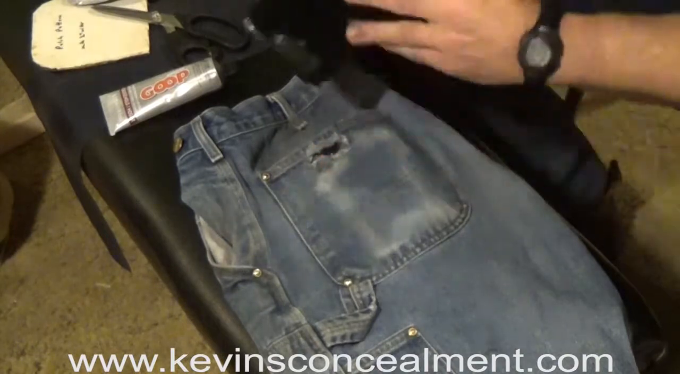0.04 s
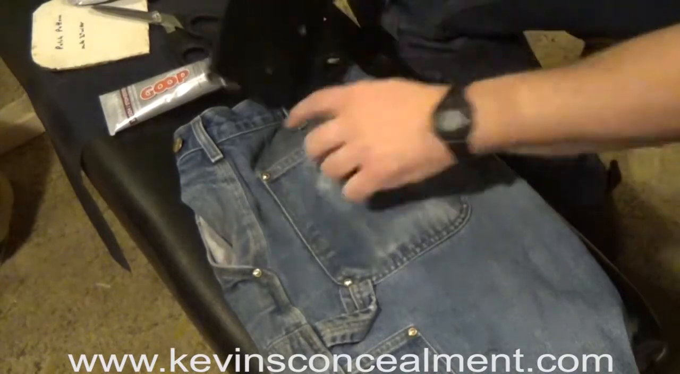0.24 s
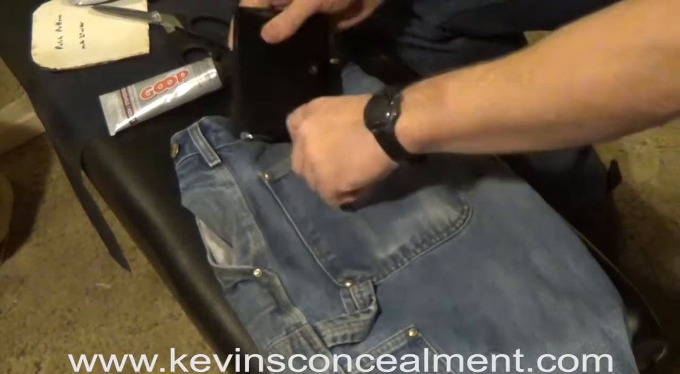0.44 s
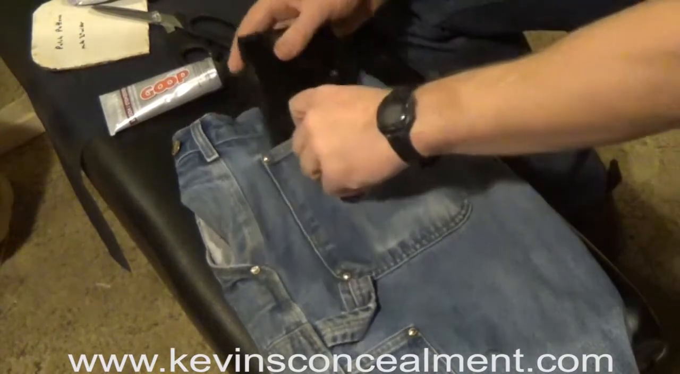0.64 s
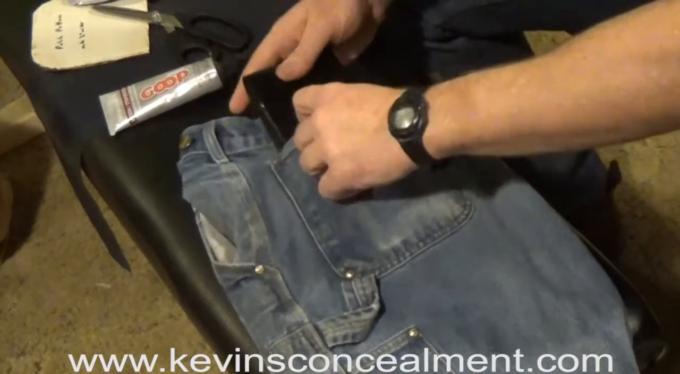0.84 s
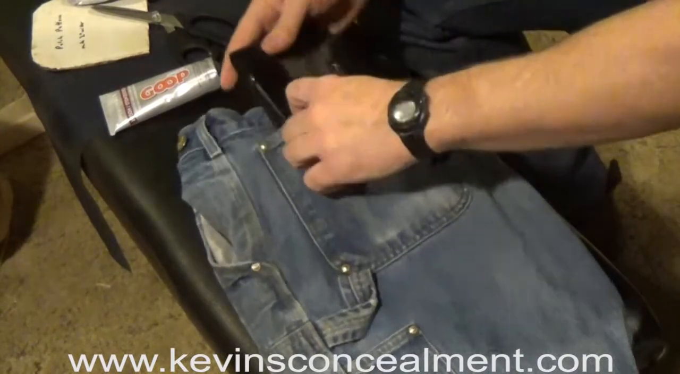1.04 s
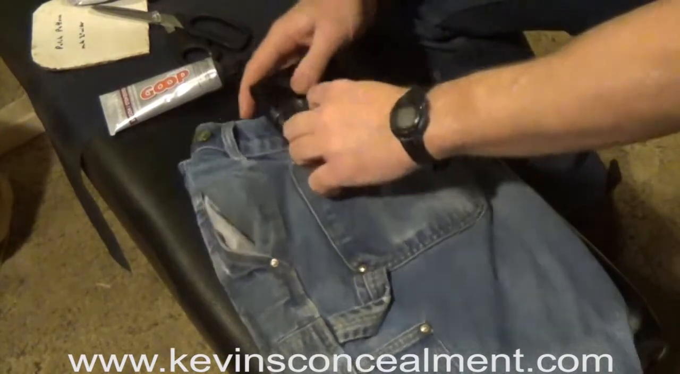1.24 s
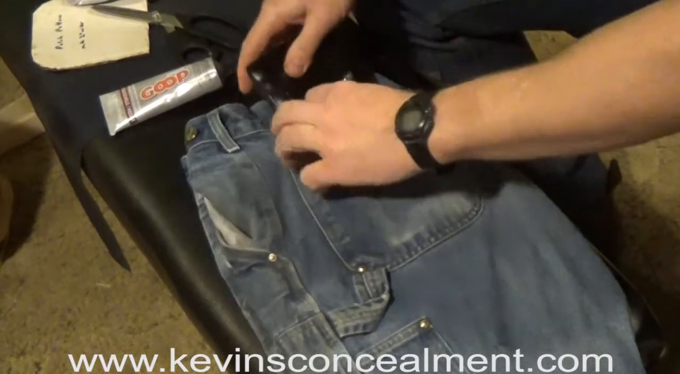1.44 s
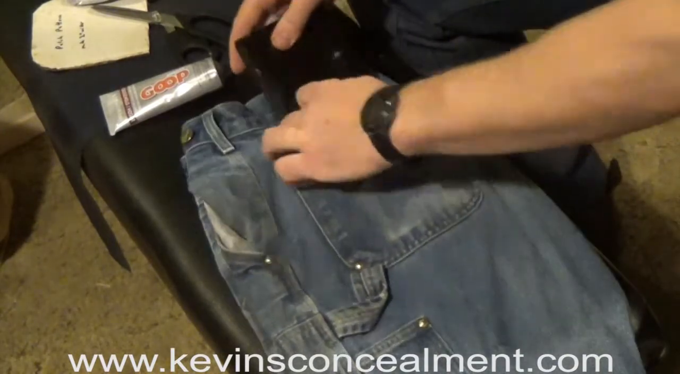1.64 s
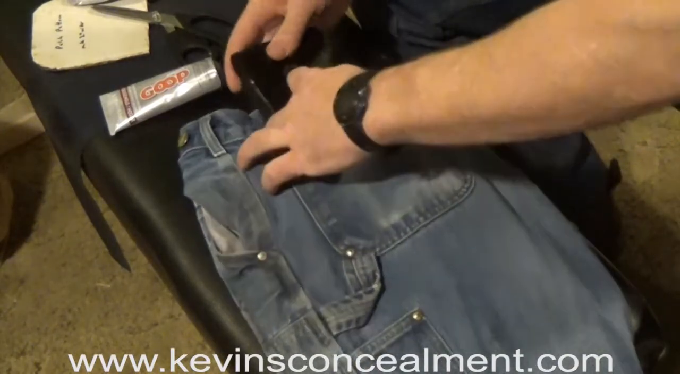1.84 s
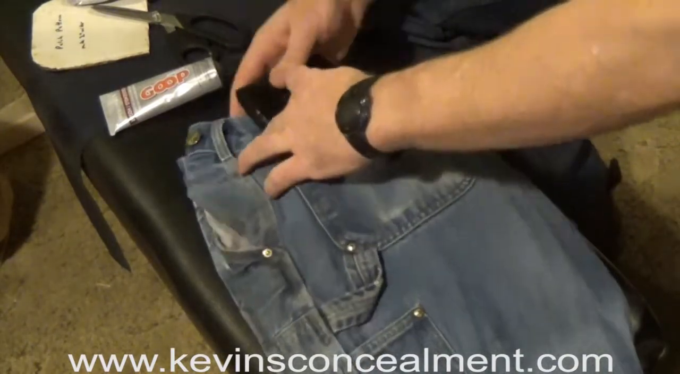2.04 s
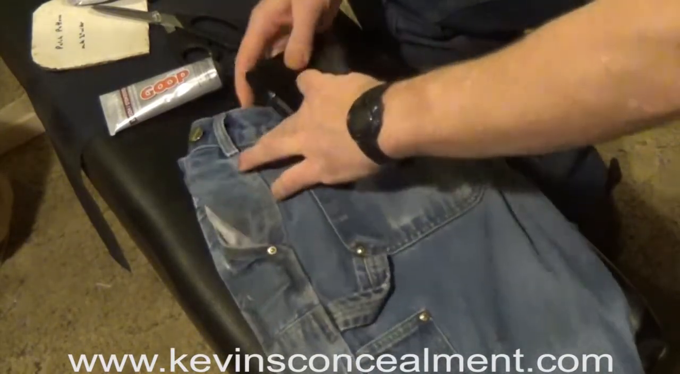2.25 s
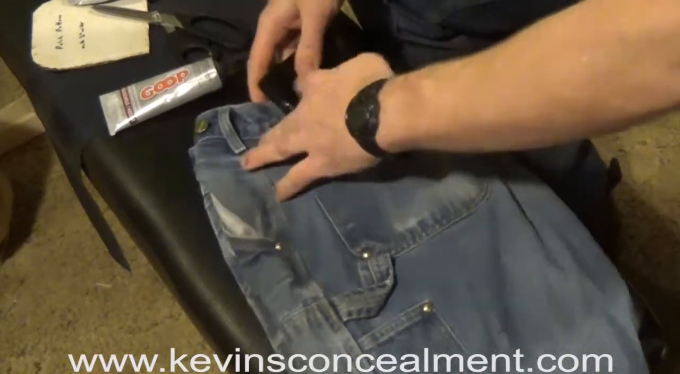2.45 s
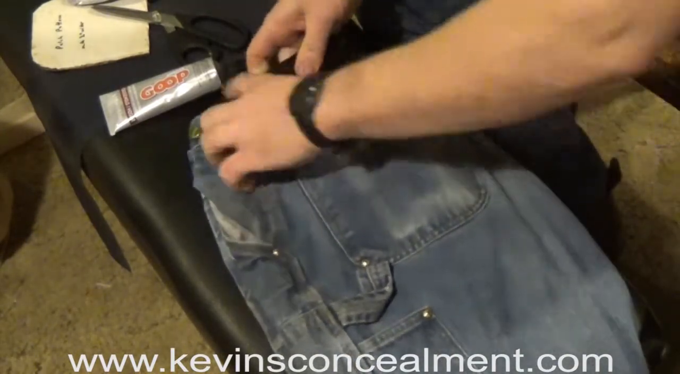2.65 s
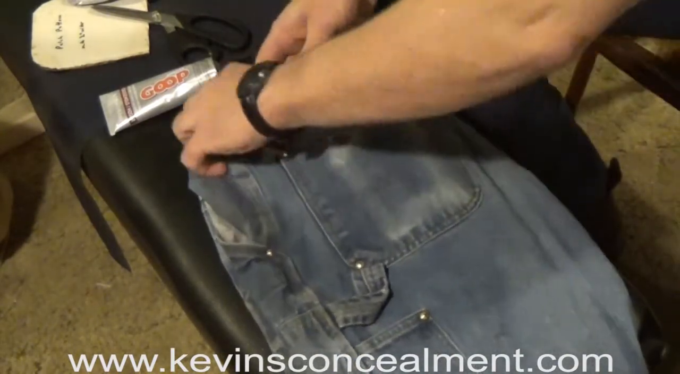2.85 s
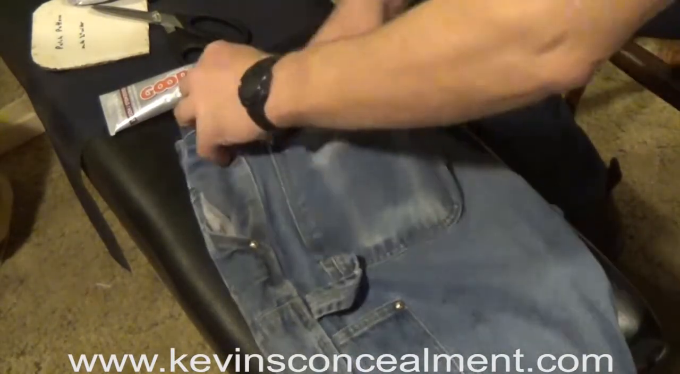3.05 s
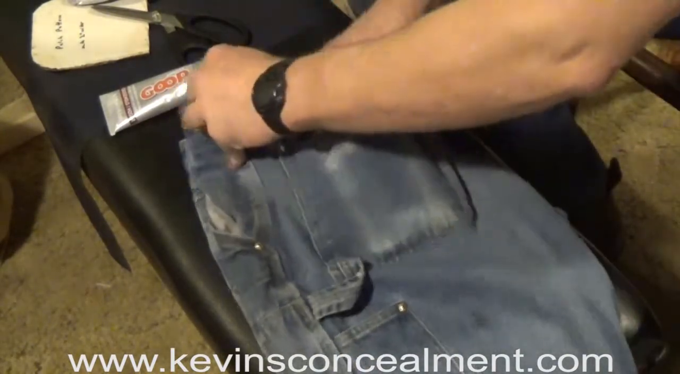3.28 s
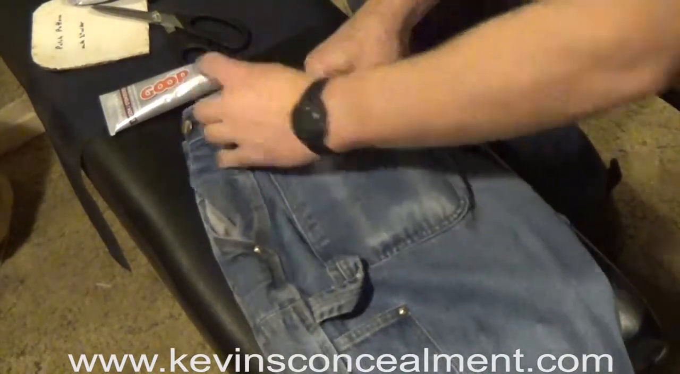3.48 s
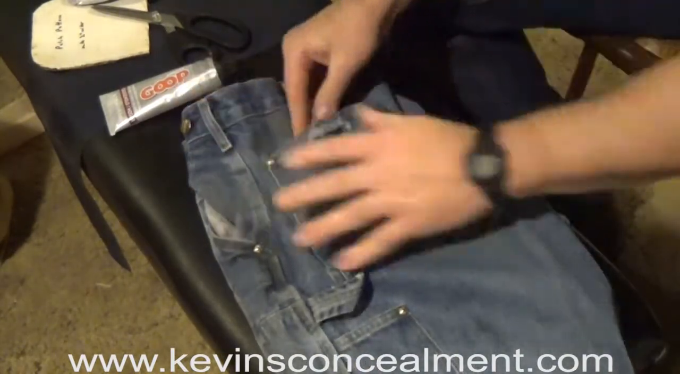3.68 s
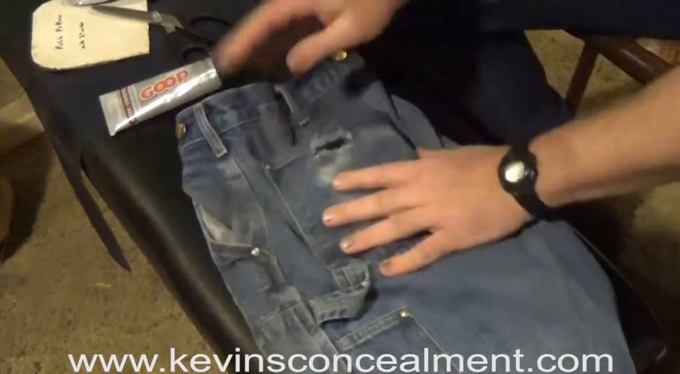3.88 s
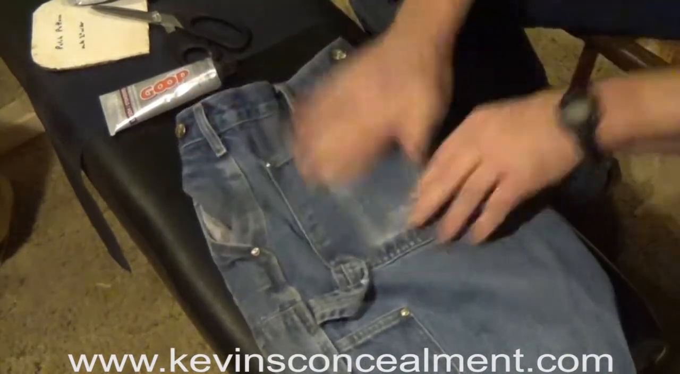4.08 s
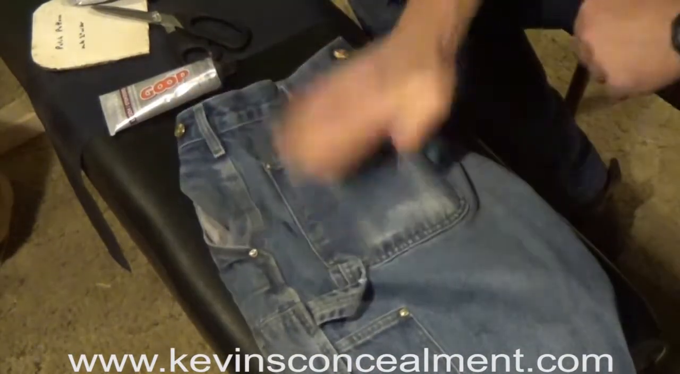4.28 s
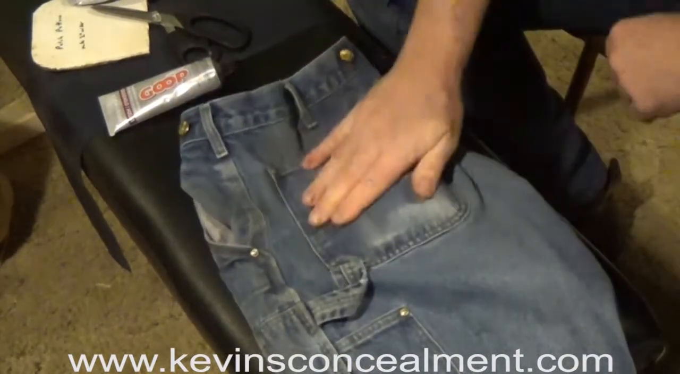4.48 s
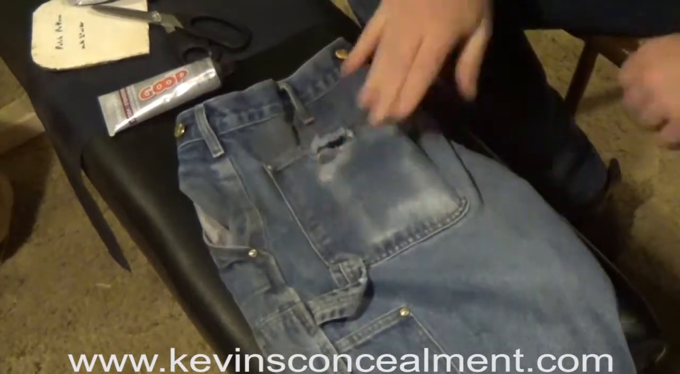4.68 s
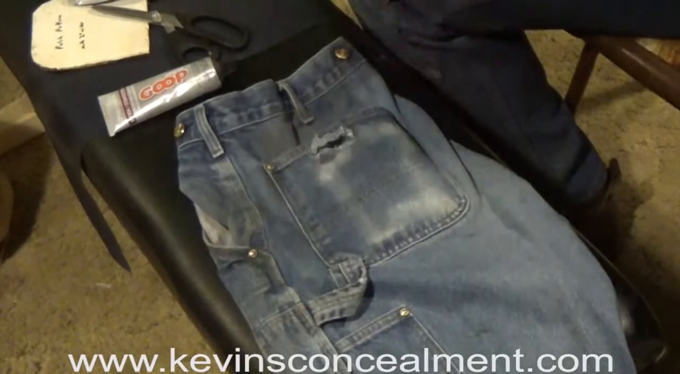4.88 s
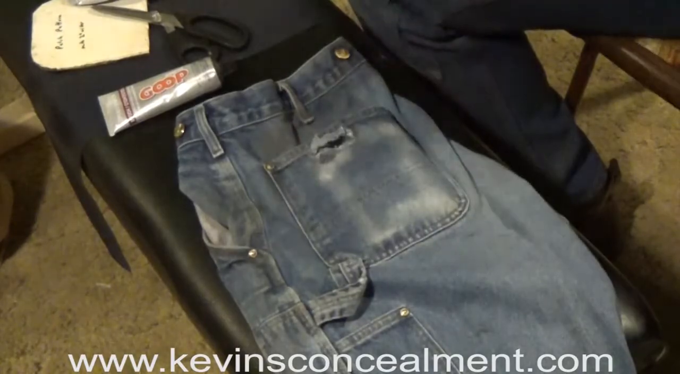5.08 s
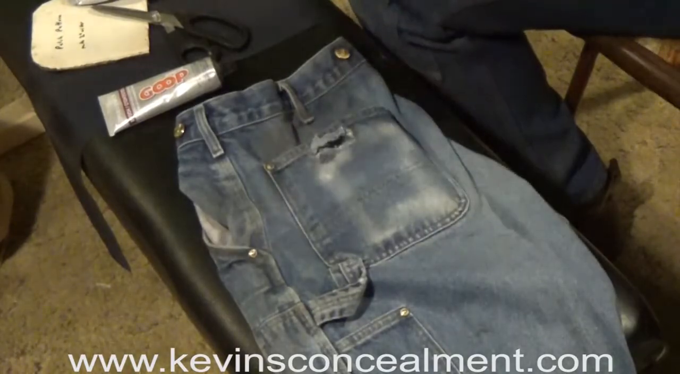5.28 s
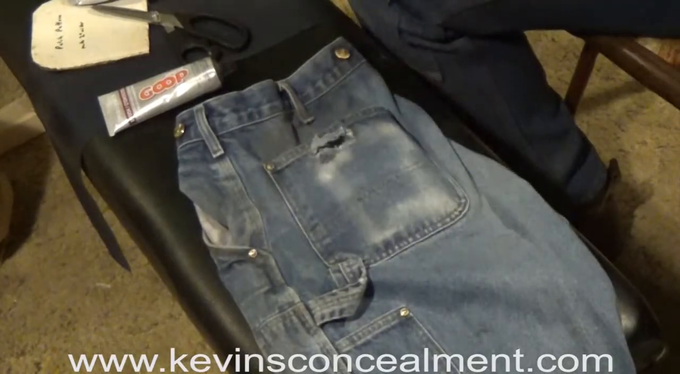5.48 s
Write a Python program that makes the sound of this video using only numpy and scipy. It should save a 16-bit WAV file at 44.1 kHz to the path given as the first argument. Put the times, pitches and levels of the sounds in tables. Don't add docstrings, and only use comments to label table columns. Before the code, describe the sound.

A quiet, small furnished room with steady faint air noise, heard by a close stereo camera microphone. At 0 s a leather piece slips and rubs on denim with a clear tick and a quick palm brush. From 0.2 to 1 s soft folds and drags continue, strongest near 0.75 s. Between 1.1 and 2.7 s come irregular short rustles, skin strokes and dry light taps, busiest around 1.6-2.5 s. At 3-3.5 s rubbing grows fuller, with several small knocks. At 3.8 s a palm lands in a lighter, midrange pat; at 4.15 s a loud, bright slap, then at 4.37 s another full slap, each with a very short soft room tail. Afterwards it is nearly still: a gentle hand sweep with a small tick about 5 s, tiny cloth ticks at 5.3 and 5.5 s, and an extremely faint, wavering low motor hum far away.

```python
import sys
import numpy as np
from scipy import signal
from scipy.fft import rfft, irfft
from scipy.io import wavfile
from scipy.ndimage import uniform_filter1d

SR = 44100
rng = np.random.default_rng(int(sys.argv[2]) if len(sys.argv) > 2 else 0)


def materialize(psi):
    bounded = np.clip(np.atleast_2d(psi).T, -1, 1)
    quanta = np.round(bounded * 32767).astype(np.int16)
    wavfile.write(sys.argv[1], SR, quanta)


def how_loud(loudness_db):
    steps = np.asarray(loudness_db, float) / 20
    return 10 ** steps


N = 243541
TIME = np.arange(N) / SR


def read(table, hz):
    f, v = np.transpose(table)
    return np.interp(np.log(np.maximum(hz, 1)), np.log(np.maximum(f, 1)), v)


def unit(x):
    return x / np.sqrt(np.mean(x ** 2))


def colour(x, table, size=4096):
    hz = np.arange(size // 2 + 1) * SR / size
    cep = irfft(np.log(how_loud(read(table, hz))))
    cep[1:size // 2] *= 2
    cep[size // 2 + 1:] = 0
    impulse = irfft(np.exp(rfft(cep)))
    impulse = np.broadcast_to(impulse, x.shape[:-1] + (size,))
    return signal.fftconvolve(x, impulse, axes=-1)[..., :x.shape[-1]]


def band(x, lo_hz, hi_hz):
    return signal.sosfilt(signal.butter(2, [lo_hz, hi_hz], "band", fs=SR, output="sos"), x)


def soft_low(x, hz):
    return signal.sosfilt(signal.butter(1, hz, fs=SR, output="sos"), x)


def walk(rate):
    hold = int(SR / rate)
    levels = rng.standard_normal(N)[np.arange(N) // hold]
    return 1.26 * uniform_filter1d(levels, hold)


def effort(rows):
    span_db = 17.5
    bend = 1.14
    s, db, rise, fall = np.transpose(rows)[:, :, None]
    before = (s - TIME) / np.maximum(rise, .003)
    after = (TIME - s) / np.maximum(fall, .003)
    away = np.where(TIME < s, before, after)
    return np.sqrt(np.sum(how_loud(2 * (db - span_db * away ** bend)), axis=0))


def room_air():
    # [f/Hz, density/dB per Hz]
    air_spectrum = [(12, -77), (20, -59), (81, -3.5), (187, -8), (337, 1.5), (590, -5), (660, -2),
                    (738, -4.5), (1150, -7.5), (1480, -7), (1910, -11), (3160, -9), (6180, -15),
                    (14300, -22), (16000, -26)]
    air = unit(colour(rng.standard_normal((2, N)), air_spectrum, size=8192))
    return air * how_loud(-61 + 0.13 * walk(5.3))


def hum():
    # [t/s, f/Hz, level/dB]
    motor_path = [(4.5, 131.6, -62), (4.522, 135, -78), (4.606, 134, -72.5), (4.966, 148, -74),
                  (5.12, 148, -70), (5.18, 146.3, -83), (5.302, 142, -71), (5.35, 145, -83)]
    s, hz, db = np.transpose(motor_path)
    level = how_loud(np.interp(TIME, s, db, -120, -120))
    phase = 2 * np.pi * np.cumsum(np.interp(TIME, s, hz)) / SR
    return np.sqrt(2) * level * np.sin(phase)


def fibres(spread_db, flicker_db, rate):
    # [f/Hz, density/dB per Hz]
    denim_colour = [(71, -76), (120, -24), (141, -16.5), (213, -13), (314, -10), (557, -7), (617, -2.5),
                    (1140, -0.5), (1430, 0.5), (1790, -3), (6240, -11), (16000, -31.5)]
    sizes = np.minimum(rng.exponential(size=N), 6)
    slips = rng.standard_normal((2, N)) * how_loud(spread_db * sizes)
    return colour(slips * how_loud(flicker_db * walk(rate)), denim_colour)


def cloth():
    # [t/s, rub level/dB, fall/s, fold over rub/dB]
    sudden_slips = [(0.0, -41, 0.072, -4.5), (.072, -51, 0.044, 4), (.554, -66, 0.054, 0),
                    (1.248, -55.5, 0.029, 8.5), (1.641, -59, 0.044, 5), (1.705, -58.5, 0.16, -2.5),
                    (1.875, -48, 0.089, -1.5), (2.197, -49.5, 0.026, 4.5), (2.649, -52.5, .04, -6),
                    (4.565, -67, .1, 6), (5.338, -57.5, .05, -6), (5.465, -66, 0.04, -4)]
    # [t/s, rub level/dB, rise/s, fall/s, fold over rub/dB]
    slow_drags = [(.21, -65, 0.082, 0.19, 0), (.468, -61, 0.22, .07, -4), (.66, -77, .1, .1, 2),
                  (0.741, -47.5, 0.072, 0.065, -2.5), (.85, -58, 0.28, 0.34, -11),
                  (1.01, -56, 0.075, 0.16, -4), (1.15, -59, .07, .2, -1), (1.3, -61.5, 0.085, 0.19, -16),
                  (1.42, -57.5, 0.27, 0.2, -2.5), (1.59, -60.5, 0.14, 0.29, -6),
                  (2.044, -59.5, 0.062, 0.047, 6.5), (2.095, -52.5, 0.089, 0.027, -3),
                  (2.262, -54.5, .02, 0.093, -4), (2.31, -54.5, 0.15, 0.13, 2.5),
                  (2.489, -61, 0.11, .15, -2.5), (2.571, -57.5, 0.14, 0.25, -6),
                  (2.806, -63.5, 0.22, 0.071, 3.5), (2.938, -53.5, 0.083, 0.13, -8),
                  (3.054, -47, 0.17, 0.11, -1.5), (3.2, -58, 0.16, 0.063, -9),
                  (3.333, -49.5, 0.068, 0.099, 1.5), (3.49, -61, 0.22, 0.14, -3.5),
                  (3.68, -54.5, 0.16, 0.073, -4.5), (4.12, -59, 0.17, 0.12, -8)]
    # [t/s, level/dB, rise/s, fall/s]
    palm_sweeps = [(.068, -44.5, .06, 0.024), (.106, -50.5, .1, .1), (.3, -56, .06, 0.077),
                   (.468, -60.5, .2, 0.047), (1.139, -51, .035, 0.019), (1.45, -60, .3, 0.087),
                   (1.8, -62, .1, 0.11), (1.905, -54.5, 0.059, 0.048), (2.044, -55.5, .07, 0.044),
                   (2.317, -62, .2, 0.23), (2.489, -57, .08, 0.078), (2.806, -59.5, .13, 0.16),
                   (3.175, -62, .1, 0.071), (3.34, -49, .05, 0.047), (3.51, -59, 0.05, 0.071),
                   (3.66, -58, .13, 0.16), (3.93, -64, .05, 0.049), (3.996, -58, .05, 0.18),
                   (4.11, -52.5, .07, 0.11), (4.151, -43, .02, .02), (4.6, -63.5, .1, 0.18),
                   (4.728, -59.5, .2, 0.15), (4.9, -54, 0.056, 0.25), (5.0, -43, .055, .065),
                   (5.36, -67, 0.04, .06)]
    slip_rise_s, nap_db = 0.0069, -6
    hands_off_s = 4.151
    palm_flat_s = [(3.775, 3.93), (4.151, 4.56)]

    fold_noise = band(fibres(2.16, 2.1, 40), 188, 800)
    rub_noise = band(fibres(4.0, 2.16, 50), 716, 3700)
    brush_noise = band(fibres(3.6, 0.33, 60), 2730, 19700)

    moves = [(s, db, slip_rise_s, fall, over) for s, db, fall, over in sudden_slips] + list(slow_drags)
    fold = effort([(s, db + over, rise, fall) for s, db, rise, fall, over in moves])
    rub = effort([(s, db, rise, fall) for s, db, rise, fall, over in moves])
    brush = np.hypot(effort(palm_sweeps), how_loud(nap_db) * rub)

    fidget = how_loud(np.array([[-72.5], [-75], [-71]])) * (TIME < hands_off_s)
    still = sum((TIME > a) & (TIME < b) for a, b in palm_flat_s)
    gains = np.hypot([fold, rub, brush], fidget) * (1 - still)
    layers = [fold_noise, rub_noise, brush_noise]
    return sum(unit(x) * uniform_filter1d(gain, size=128) for x, gain in zip(layers, gains))


def strokes():
    # [t/s, peak level/dB, centre f/Hz, length/s]
    skin_strokes = [(.115, -41, 5540, 0.017), (0.282, -50, 6040, .04), (0.265, -52.5, 9700, 0.072),
                    (1.127, -46, 6170, 0.023), (1.665, -46.5, 3960, 0.023), (1.71, -46.5, 5000, 0.0087),
                    (1.869, -37, 4330, 0.011), (1.916, -45, 6100, 0.017), (2.806, -55, 4670, 0.029),
                    (3.088, -49, 8000, 0.016), (3.327, -46.5, 6000, 0.033), (4.127, -33.5, 2350, 0.02),
                    (4.131, -51, 6000, 0.023)]
    out, t = np.zeros(N), TIME[:4096]
    noises = rng.standard_normal((len(skin_strokes), 4096))
    for (s, db, hz, length), noise in zip(skin_strokes, noises):
        swell = np.sin(np.pi * np.clip(t / length, 0, 1)) ** 2
        hiss = unit(band(noise, hz / 1.105, hz * 1.15)) + 0.32 * unit(band(noise, 3400, 12000))
        start = int(s * SR)
        out[start:start + 4096] += how_loud(db - 11.0) * swell * hiss
    return out


def taps():
    # [t/s, peak level/dB, ring f/Hz, treble level/dB]
    edge_ticks = [(0.067, -23.5, 1386, -11.5), (0.55, -42.5, 1400, -5), (1.128, -45, 1460, -9),
                  (1.239, -38.5, 400, -7), (1.393, -41, 523, -14), (1.633, -36.5, 1490, -7),
                  (1.675, -42.5, 660, -9), (1.711, -41.5, 406, -12), (1.872, -32.5, 4490, -30),
                  (1.883, -35.5, 1460, -22), (1.921, -35, 1520, -2), (2.031, -35.5, 1430, -18),
                  (2.081, -37.5, 715, -13), (2.191, -30.5, 1930, -1.5), (2.247, -35.5, 1450, -6),
                  (2.309, -41, 388, -24), (2.354, -36, 730, 3), (2.478, -45, 2920, -9),
                  (2.64, -32, 1650, -31), (3.024, -34, 1460, -20), (3.052, -31, 1534, -1),
                  (3.082, -37, 640, -17), (3.29, -37.5, 760, -11), (3.314, -30, 610, -13),
                  (3.331, -32, 1030, -24), (3.489, -50, 525, -5), (4.085, -42, 7000, -7),
                  (4.984, -34, 3880, -14), (5.33, -48, 530, -15), (5.46, -43, 1010, -32)]
    # [t/s, peak level/dB, ring f/Hz, treble level/dB, ring t60/s]
    hand_contacts = [(2.6435, -35.5, 810, -22, 0.022), (3.784, -38, 1500, -20, 0.032),
                     (3.79, -28, 880, -13, 0.064), (3.7945, -17, 700, -8, 0.012),
                     (3.796, -16.5, 413, -4.5, 0.05), (3.7966, -16, 753, -8.5, 0.032),
                     (3.7957, -9.5, 3720, -1, 0.01), (3.8009, -15, 1030, -5, 0.011),
                     (4.1507, -13, 1660, -10, 0.014), (4.1549, -10, 1740, -10, 0.0077),
                     (4.1618, -16, 1497, -26, 0.031), (4.365, -11.5, 2170, -11, 0.03),
                     (4.3668, -9.5, 702, -12, 0.021), (4.381, -15.5, 647, -16, 0.064),
                     (4.3864, -10, 870, -12, 0.0071)]
    t60_1khz_s, damping = 0.033, 0.29
    out, t = np.zeros(N + 4096), TIME[:4096]
    rows = [(*row, t60_1khz_s * (1000 / row[2]) ** damping) for row in edge_ticks] + list(hand_contacts)
    noises = rng.standard_normal((len(rows), 4096))
    for (s, db, hz, treble_db, t60), noise in zip(rows, noises):
        attack = np.minimum(t / 0.00024, 1)
        fade = how_loud(-60 * t / np.clip(t60, .004, .2)) * attack
        rough = band(fade * noise, hz / 1.86, hz * 1.56)
        ring = fade * np.sin(2 * np.pi * hz * t) + 0.66 * rough / np.abs(rough).max()
        crack = band(np.sign(noise) * how_loud(-60 * t / 0.0053), 1030, 4860)
        sound = ring + how_loud(treble_db + 8.5) * crack / np.abs(crack).max()
        start = int(s * SR)
        out[start:start + 4096] += how_loud(db - 3.5) * sound / np.abs(sound).max()
    return band(out[:N], 247, 19000)


def slaps():
    # [t/s, peak level/dB, first fall/dB per s, later fall/dB per s squared]
    palm_slaps = [
        (3.79, -17, 219, 903),
        (4.151, -5, 114, 905),
        (4.365, -4, 89, 887.5),
    ]
    # [f/Hz, density/dB per Hz]
    slap_colours = [
        [(40, -47), (190, -21), (300, -31), (420, -8), (700, -10), (1000, 5), (1600, -4), (3000, -14),
         (4500, -18), (6300, -19), (10000, -59), (16000, -56)],
        [(40, -41), (170, -24.5), (310, -9), (500, -3.5), (1000, -9), (1600, -5.5), (3200, -9), (5200, -18),
         (6500, -14.5), (8000, -30), (11000, -32), (16000, -59)],
        [(40, -63), (190, -25), (260, -3), (500, 3), (1050, -2.5), (2250, 2.5), (3500, -2.5), (6500, -9.5),
         (8000, -17), (11500, -22), (16000, -73)],
    ]
    out, t = np.zeros((2, N)), TIME[:SR // 2]
    for (s, db, fall_db, bend_db), table in zip(palm_slaps, slap_colours):
        grain_db = 1.3 * rng.exponential(size=len(t)) + 1.25 * walk(248.6)[:len(t)]
        air = rng.standard_normal((2, len(t))) * how_loud(grain_db)
        attack = np.minimum(t / 0.0024, 1)
        air = air * how_loud(-fall_db * t - bend_db * t ** 2) * attack
        low = soft_low(air, 5500)
        treble = 1.25 * (air - low) * how_loud(-150 * t)
        burst = colour(low + treble, table)
        start = int(s * SR)
        out[:, start:start + len(t)] += unit(burst) * how_loud(db - 27.0)
    return out


def room(x, wet_db):
    # [f/Hz, t60/s]
    decay_times = [(200, 0.26), (1000, 0.28), (4000, 0.24), (12000, 0.26)]
    t = TIME[:SR // 2]
    edge = np.sqrt(2)
    tail = np.zeros((2, len(t)))
    for hz in 60 * 2. ** np.arange(8):
        octave = band(rng.standard_normal((2, len(t))), hz / edge, hz * edge)
        tail += octave * how_loud(-60 * t / read(decay_times, hz))
    tail = soft_low(tail, 5000)
    tail = tail * np.clip(t / 0.0022 - .5, 0, 1)
    tail = tail / np.sqrt(np.sum(tail ** 2, axis=1, keepdims=True))
    wet = signal.fftconvolve(np.broadcast_to(x, (2, N)), tail, axes=1)[:, :N]
    return x + how_loud(wet_db) * wet


def ports(x, spread):
    # [f/Hz, coherence/0-1]
    port_likeness = [(60, 1), (290, 0.99), (640, 0.79), (1400, 0.67), (3100, 0.45), (6800, 0.94),
                     (11000, 0.93), (13000, 0.96)]
    # [f/Hz, phase/radians]
    left_lead = [(60, -0.28), (200, -0.46), (430, -0.7), (1100, -0.99), (2400, -0.65), (3500, 0.14),
                 (6000, -0.17), (9000, -0.56), (11000, 0.19)]
    # [f/Hz, left minus right/dB]
    port_tilt = [(30, 4), (100, -1.5), (500, -2), (2000, -1.6), (5000, -1), (11000, 0.8)]
    hz = np.arange(N // 2 + 1) * SR / N
    like = 1 - np.clip(spread * (1 - read(port_likeness, hz)), 0, 1)
    turn = np.exp(.5j * read(left_lead, hz)) * how_loud(read(port_tilt, hz) / 2)
    a, b = rfft(x)
    left = a * turn
    right = (like * a + np.sqrt(1 - like ** 2) * b) / turn
    return irfft(np.array([left, right]), N)


def scene():
    air = ports(room_air(), 0.98)
    rustle = ports(room(cloth(), -15.0), 0.34)
    hits = room(taps() + strokes(), -9.5) + room(slaps(), -15.0)
    return air + hum() + rustle + ports(hits, 0.56)


def band_limit(x):
    return signal.sosfilt(signal.butter(12, 16500, fs=SR, output="sos"), x)


def record(dry):
    thinned = signal.sosfilt(signal.butter(1, 30, "high", fs=SR, output="sos"), dry)
    mix = signal.sosfilt(signal.ellip(12, .2, 90, 15700, fs=SR, output="sos"), thinned)
    return band_limit(mix)


dry = scene()
out = record(dry)
materialize(out)
```